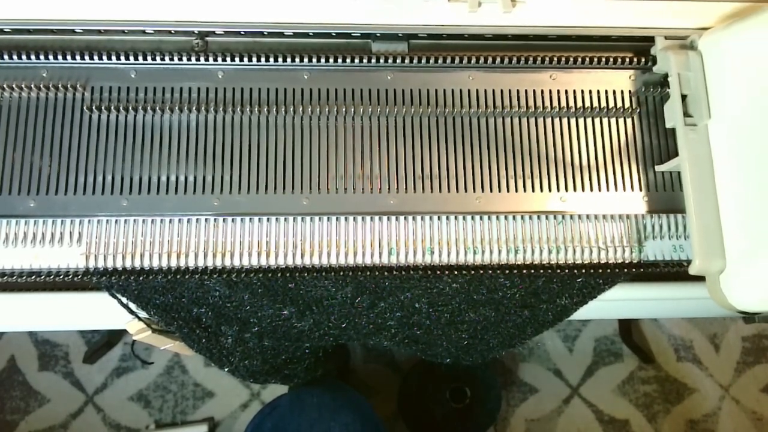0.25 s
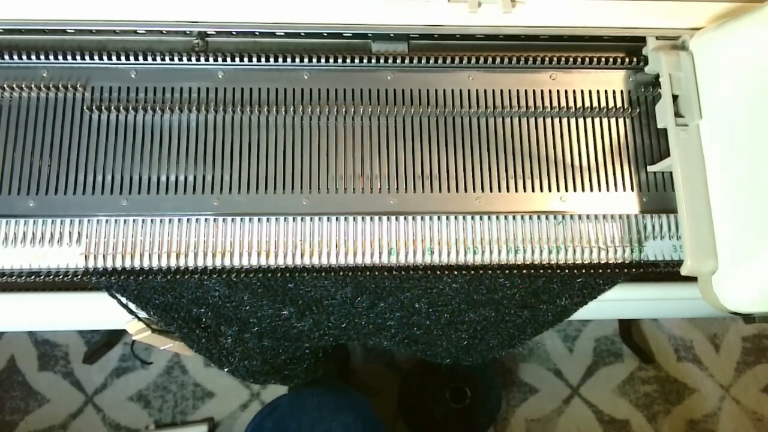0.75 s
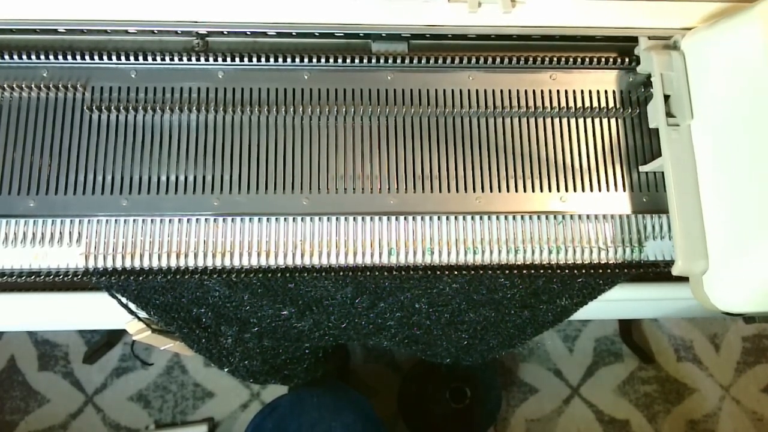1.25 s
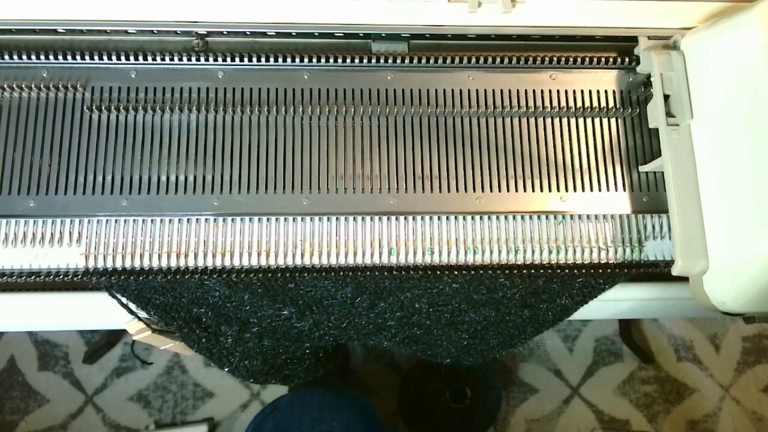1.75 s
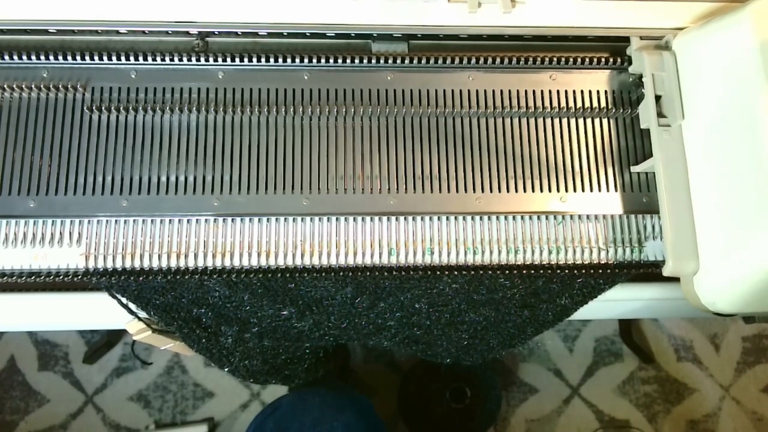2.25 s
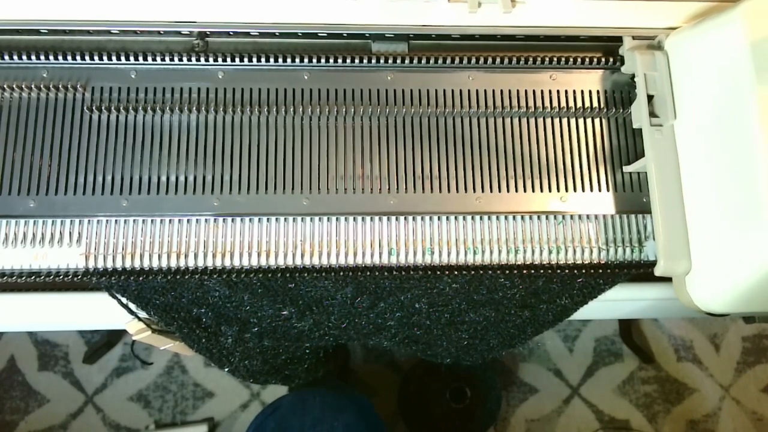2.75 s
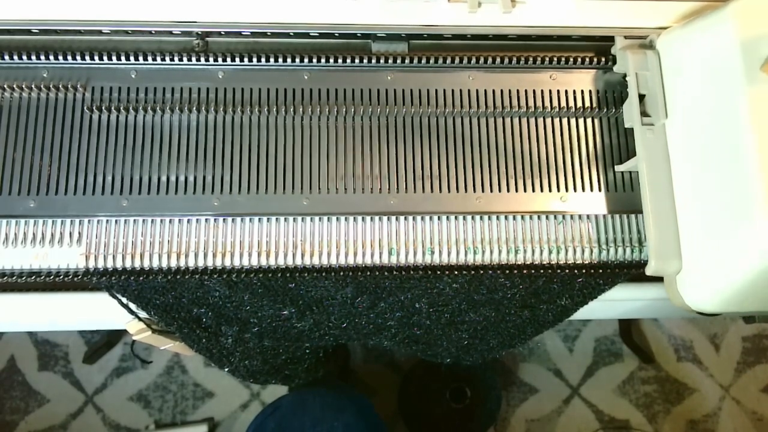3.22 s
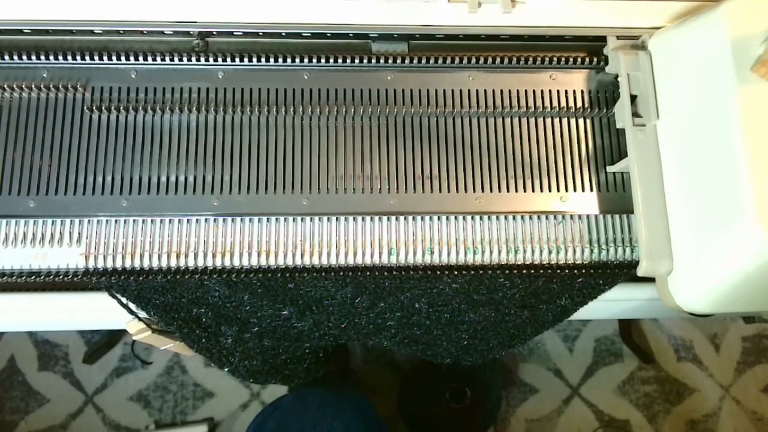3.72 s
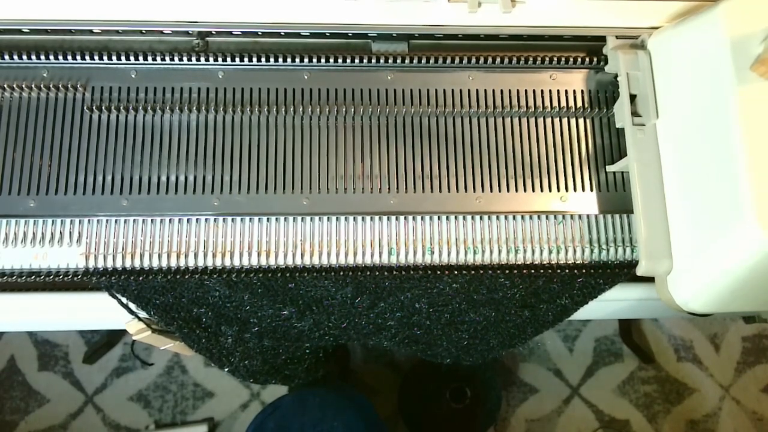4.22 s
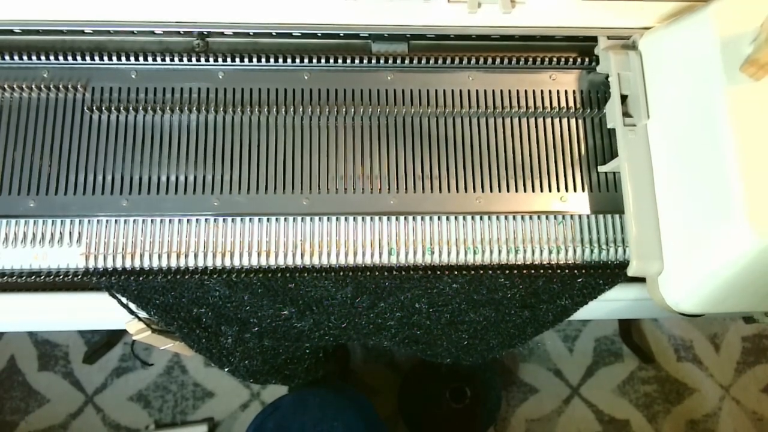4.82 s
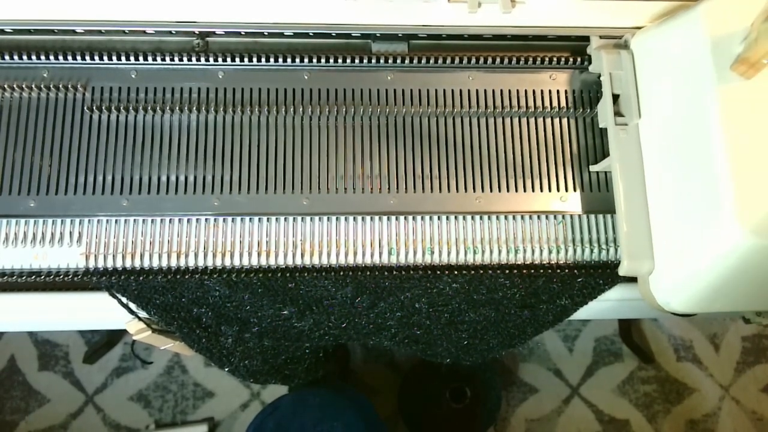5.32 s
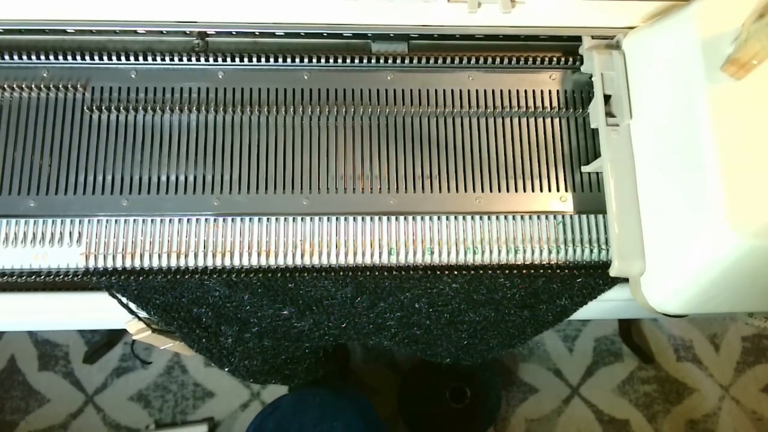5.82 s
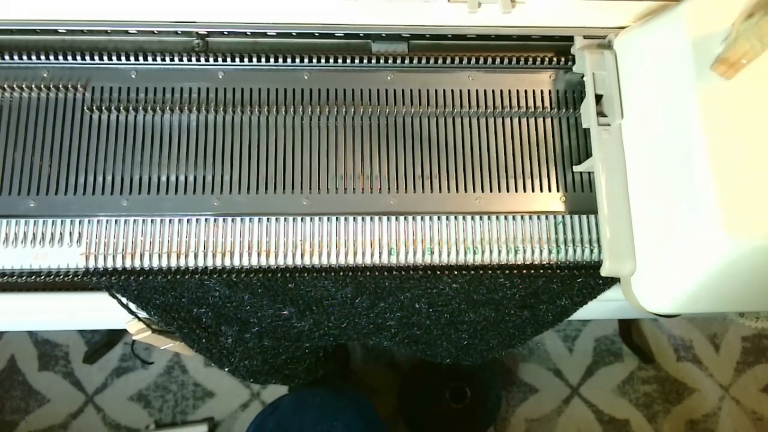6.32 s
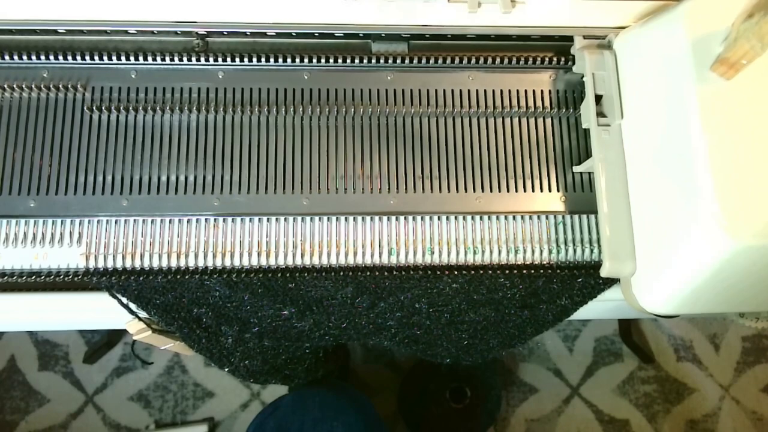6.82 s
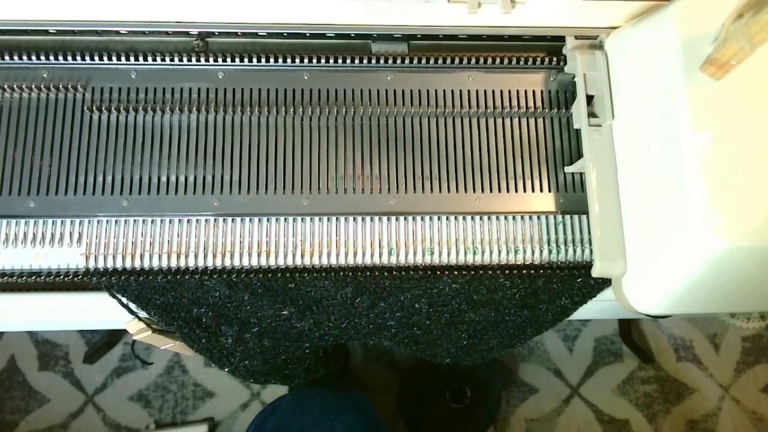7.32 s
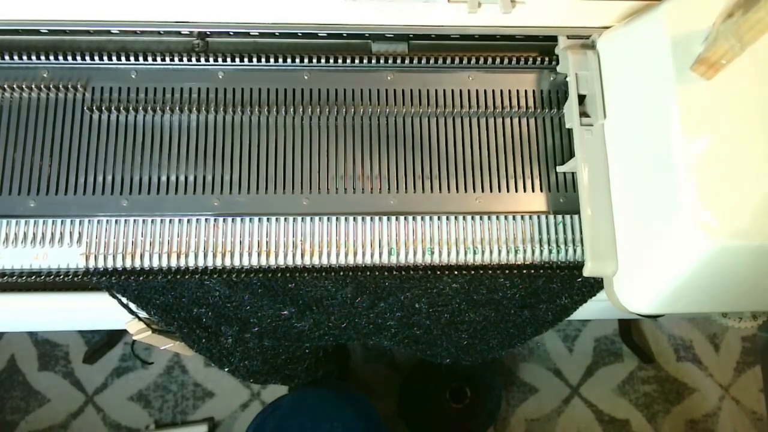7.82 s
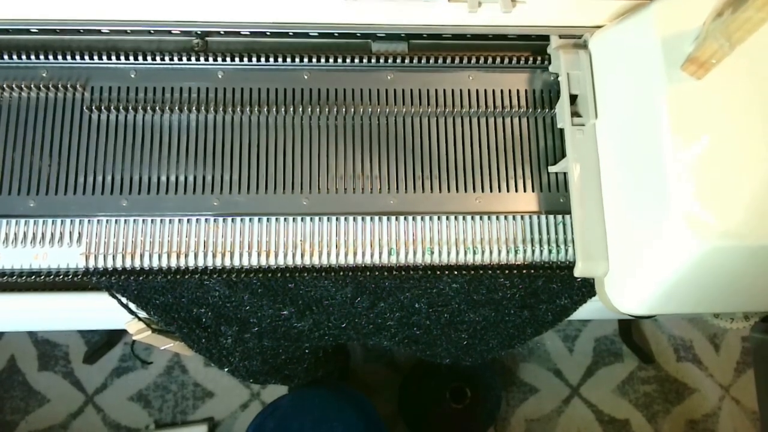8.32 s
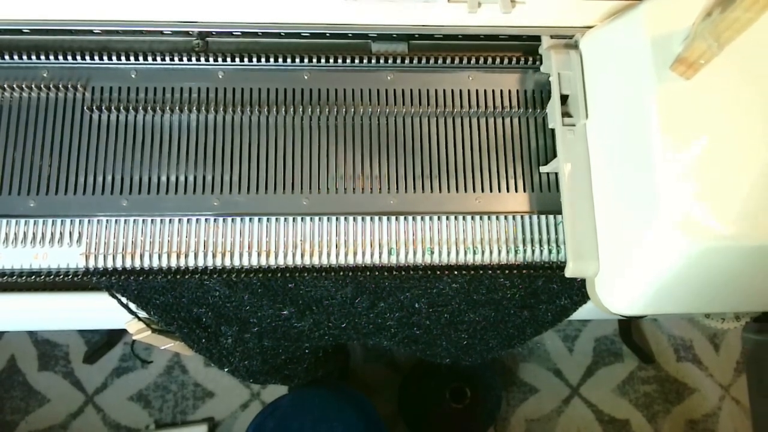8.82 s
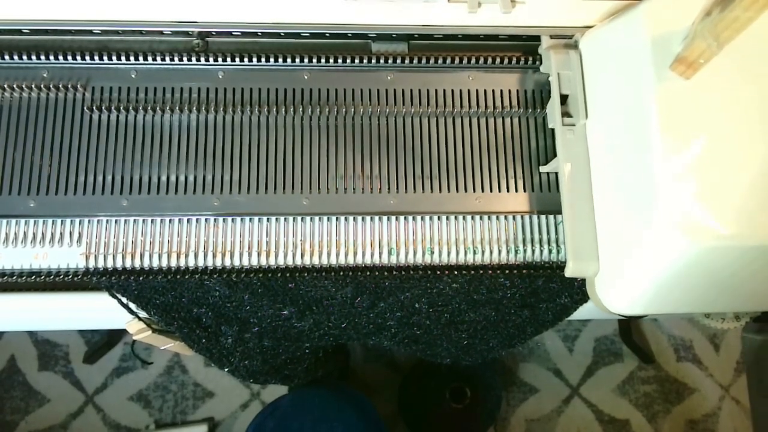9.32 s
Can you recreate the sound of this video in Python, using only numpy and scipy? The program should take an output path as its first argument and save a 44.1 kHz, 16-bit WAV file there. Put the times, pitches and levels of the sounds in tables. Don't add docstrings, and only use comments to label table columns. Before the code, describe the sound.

A motorised knitting machine carriage runs throughout in a small room. A gritty motor whir swells and eases with each stitch, while casing, cams, needles and latches clatter in the same uneven run of clicks about every 0.63 seconds. Small metallic pings and occasional stray snaps poke through. The close microphone sounds bright and slightly overloaded, with a ringing edge near 4.4 kHz.

```python
import sys
import numpy as np
from scipy import signal
from scipy.fft import rfft, irfft, next_fast_len
from scipy.io import wavfile
from scipy.ndimage import uniform_filter1d

SR = 44100
rng = np.random.default_rng(int(sys.argv[2]) if len(sys.argv) > 2 else 0)


def gain_from_db(level_db):
    decades = np.asarray(level_db, float) / 20
    return 10 ** decades


def persist_wave(psi):
    counts = np.round(np.clip(psi, -1, 1) * 32767).astype(np.int16)
    wavfile.write(sys.argv[1], SR, np.atleast_2d(counts).T)


N = 421575


def at_hz(points, hz):
    point_hz, point_db = np.array(points).T
    return np.interp(np.log(hz + 1), np.log(point_hz), point_db)


def colour(x, points, turn=1):
    size = next_fast_len(N + 4096)
    hz = np.arange(size // 2 + 1) * SR / size
    return irfft(turn * rfft(x, size) * gain_from_db(at_hz(points, hz)), size)[:N]


def ring(clicks, hz, t60):
    radius = gain_from_db(-60 / (t60 * SR))
    angle = 2 * np.pi * hz / SR
    return signal.lfilter([0, np.sin(angle)], [1, -2 * radius * np.cos(angle), radius ** 2], clicks + 1e-18)


def swell(blows, length_s):
    fade = np.exp(-1 / (length_s * SR))
    return signal.lfilter([2 * (1 - fade) ** 1.5], [1, -2 * fade, fade ** 2], blows + 1e-18)


def grains(grain_db):
    grit = rng.standard_normal(N) * gain_from_db(grain_db * np.minimum(rng.exponential(1, N), 5))
    return grit / grit.std()


def drift(rate):
    knots = rng.standard_normal(9000)
    return np.interp(np.arange(N) / SR * rate, np.arange(9000), knots)


def train(seconds, sizes):
    at = np.round(seconds * SR).astype(int)
    inside = (at >= 0) & (at < N)
    clicks = np.zeros(N)
    np.add.at(clicks, at[inside], sizes[inside])
    return clicks


def stitch_starts():
    first_s, stitch_s, slowing_s = .0012, .63023, .000028
    stitch = np.arange(-1, 16)
    return first_s + stitch_s * stitch + slowing_s * stitch ** 2


def once_a_stitch(into_s, scatter_db):
    seconds = stitch_starts() + into_s
    return train(seconds, gain_from_db(scatter_db * rng.standard_normal(len(seconds))))


def load_db():
    # into_stitch_s [s], level_db [dB]
    strain = [(0, 3.5), (.06, 7), (.13, 4.5), (.2, 3.5), (.33, 2), (.39, 6), (.5, 7.5), (.59, 6.5),
              (.6306, 5)]
    t, starts = np.arange(N) / SR, stitch_starts()
    into_s = t - starts[np.clip(np.searchsorted(starts, t) - 1, 0, None)]
    return np.interp(into_s, *np.transpose(strain))


def motor(flicker_db, rumble_depth, hiss_depth):
    # pitch_hz [Hz], level_db [dB per Hz]
    whir_colour = [(18, -34), (30, -13), (64, -21.5), (384, -32), (584, -25.5), (666, -11), (822, -7.5),
                   (1350, -11.5), (2290, -9), (3220, -8.5), (4420, 2.5), (5310, -10.5), (7670, -25),
                   (16000, -39.5)]
    # pitch_hz [Hz], rms_db [dB], t60_s [s]
    housing = [(619, -53.5, 0.05), (847, -53.5, 0.025)]
    grit = grains(grain_db=3.0) * gain_from_db(flicker_db * drift(150))
    whir = colour(grit, whir_colour)
    whir *= gain_from_db(-34.0) / whir.std()
    for hz, rms_db, t60 in housing:
        hum = ring(grit, hz, t60)
        whir += gain_from_db(rms_db) * hum / hum.std()
    rumble = signal.sosfiltfilt(signal.butter(2, 500, fs=SR, output="sos"), whir)
    hiss = signal.sosfiltfilt(signal.butter(2, 8000, "high", fs=SR, output="sos"), whir)
    body = whir - rumble - hiss
    load = load_db()
    return body * gain_from_db(load) + rumble * gain_from_db(rumble_depth * load - 1.0) + hiss * gain_from_db(hiss_depth * load - 2.5)


def contact_list(blows, part, slack, force):
    # into_stitch_s [s], level_db [dB]
    gear_ticks = [(.009, -15.5), (.051, -18), (.072, -16.5), (.105, -19.5), (.161, -17.5), (.212, -23.5),
                  (.232, -17.5), (.257, -20.5), (.285, -17.5), (.325, -23.5), (.347, -19.5), (.508, -20.5),
                  (.543, -18), (.559, -15.5), (.581, -18)]
    gear_colour_db = [-23.5, -10, -0.5, -15, -24.5]
    # start_s [s], level_db [dB]
    strays = [(0.227, -24), (0.8545, -24), (1.3125, -17), (1.9435, -24), (2.1136, -21), (2.5735, -20.5),
              (3.377, -18), (3.5214, -23), (5.236, -30), (5.5674, -30), (6.19, -22), (6.4936, -29),
              (6.8502, -23), (7.8294, -33), (7.9139, -31), (8.1104, -23), (9.0523, -22), (9.3734, -21)]
    stray_colour_db = [-21, -9, 6, 2, -9]
    leads_s = [0.00495, 0.00221, .0026, .0014, .001]
    play_s, force_spread_db = .0003, 2

    ticks = np.add(gear_ticks, [0, gear_colour_db[part]])
    into_s, level_db = np.transpose(np.vstack([blows, ticks]))
    starts = stitch_starts()
    seconds = (starts[:, None] + into_s).ravel() - leads_s[part]
    at = np.clip((seconds * SR).astype(int), 0, N - 1)
    stray_s, snap_db = np.transpose(strays)
    all_s = np.append(seconds + play_s * slack[at], stray_s)
    all_db = np.append(np.tile(level_db, len(starts)), snap_db + stray_colour_db[part])
    change_db = np.append(force_spread_db * force[at], 0 * stray_s)
    return all_s, all_db, change_db


def mechanism():
    # pitch_hz [Hz], level_db [dB], t60_s [s]
    casing = [(291, -10.5, 0.093), (446, -21, 0.053), (585, -7, 0.039), (730.4, 0, 0.036),
              (829, 1.5, 0.038), (990.5, -4, 0.014), (1126, 0, 0.025)]
    # pitch_hz [Hz], level_db [dB], t60_s [s]
    cam = [(1503, -9, 0.048), (1760, -6, 0.046), (2053, -3.5, 0.021), (2340, 4, 0.0069), (2837, 9, 0.0046),
           (3224, 6, 0.0064)]
    # pitch_hz [Hz], level_db [dB], t60_s [s]
    port = [(3794, 1.5, 0.0058), (4103, 3, 0.0076), (4402, 0.5, 0.014), (4695, -1.5, 0.0088),
            (5410, -3, 0.0034)]
    # pitch_hz [Hz], level_db [dB], t60_s [s]
    needle = [(6170, 4.5, 0.0031), (7250, -0.5, 0.0032), (7600, 3, 0.0015), (9100, 4, 0.0011)]
    # pitch_hz [Hz], level_db [dB], t60_s [s]
    latch = [(10240, -2.5, 0.004), (11580, -6.5, 0.0023), (12700, 0.5, 0.0013), (15300, -1, 0.00214)]
    # into_stitch_s [s], level_db [dB]
    casing_blows = [(0.0318, -40.0), (0.0641, -32), (0.0897, -37.5), (0.1054, -47), (0.1182, -35.5),
                    (0.1441, -47), (0.1957, -57), (0.2194, -40), (0.3007, -41), (0.3582, -43.5),
                    (0.3706, -43), (0.3891, -34.0), (0.426, -32.5), (0.4355, -42), (0.4571, -40),
                    (0.4827, -52), (0.5011, -40), (0.5207, -40), (0.57, -31.5), (0.5898, -34.5)]
    # into_stitch_s [s], level_db [dB]
    cam_blows = [(0.0207, -21.5), (0.0296, -24.5), (0.0623, -17), (0.0685, -27), (0.0839, -28.5),
                 (0.1184, -32), (0.1392, -24), (0.191, -25.5), (0.2241, -27.0), (0.295, -22),
                 (0.3591, -26.0), (0.3904, -22.5), (0.4004, -21), (0.4241, -21), (0.4347, -28),
                 (0.445, -18), (0.4555, -27), (0.4786, -24.5), (0.491, -25), (0.5, -19.5), (0.5277, -29),
                 (0.5743, -17), (0.5812, -22), (0.5906, -23.5)]
    # into_stitch_s [s], level_db [dB]
    port_blows = [(0.021, -11.5), (0.033, -16), (0.0529, -10), (0.0616, -6.5), (0.0847, -8.5),
                  (0.1176, -18), (0.1444, -15), (0.19, -22), (0.2017, -13.5), (0.2247, -17.5),
                  (0.2678, -19), (0.2788, -18), (0.2953, -12), (0.362, -13.5), (0.382, -12), (0.391, -12),
                  (0.401, -10.5), (0.416, -14.5), (0.4273, -8.5), (0.4369, -11.5), (0.4472, -5.5),
                  (0.465, -34), (0.4785, -9), (0.492, -8.5), (0.5265, -14), (0.563, -17.5), (0.5721, -7.5),
                  (0.5907, -10), (0.6007, -35), (0.6216, -18)]
    # into_stitch_s [s], level_db [dB]
    needle_blows = [(0.0175, -25.5), (0.0316, -43.5), (0.052, -31), (0.0612, -21.5), (0.082, -17),
                    (0.1402, -21.5), (0.1893, -35), (0.2243, -29), (0.2676, -29.5), (0.2937, -24),
                    (0.3583, -32), (0.3801, -26.5), (0.3881, -33), (0.4005, -43), (0.4148, -25.0),
                    (0.4269, -21.5), (0.4383, -15.5), (0.4451, -18.5), (0.4781, -22.5), (0.4916, -21.5),
                    (0.5295, -25), (0.562, -22), (0.5713, -12), (0.581, -25), (0.5904, -36), (0.6227, -25)]
    # into_stitch_s [s], level_db [dB]
    latch_blows = [(0.0122, -29), (0.0605, -34), (0.0828, -23), (0.1139, -35.5), (0.1388, -32),
                   (0.1645, -35.5), (0.2006, -30.5), (0.2233, -57), (0.2682, -31), (0.2939, -29.5),
                   (0.3623, -31), (0.3833, -28.0), (0.3921, -33), (0.4237, -25), (0.4384, -19),
                   (0.4451, -22.5), (0.4557, -24), (0.4776, -39), (0.4905, -27.0), (0.5303, -22),
                   (0.5647, -18), (0.5727, -15.5), (0.5799, -28), (0.622, -33)]
    # level_db [dB], rattle_s [s], share of the force change [0-1], mode scatter_db [dB], chatter_db [dB]
    parts = [
        (0.5, 0.004, 0.17, 1.5, -6),
        (-11, 0.0036, 1, 3, -3),
        (-6, 0.0016, 0.97, 0.8, -2.5),
        (-10, 0.0018, 0.55, 3.5, -3),
        (-8.5, 0.001, .6, 2.5, 1.5),
    ]
    strikes = [.5, .5, .8, .5, .3]
    chatter_leads_s = [0.0057, 0.0049, 0.0012, 0.0053, 0.0046]
    chatter_s = 0.0041

    all_modes = [casing, cam, port, needle, latch]
    all_blows = [casing_blows, cam_blows, port_blows, needle_blows, latch_blows]
    slack, force = drift(60), drift(110)
    fine, coarse = grains(grain_db=1.2), grains(grain_db=3.0)
    out = np.zeros(N)
    for k, (modes, blows) in enumerate(zip(all_modes, all_blows)):
        seconds, levels, change_db = contact_list(blows, k, slack, force)
        part_db, rattle_s, share, scatter_db, chatter_db = parts[k]
        blow_db = levels + share * change_db + part_db
        part = np.zeros(N)
        for m, (hz, mode_db, t60) in enumerate(modes):
            sign = (-1) ** m
            size = gain_from_db(blow_db + mode_db + scatter_db * rng.standard_normal(len(seconds)))
            rattle = swell(train(seconds, size), rattle_s) * np.roll(fine, round(hz))
            rattle += strikes[k] * sign * train(seconds + .0004, size)
            loose = train(seconds - chatter_leads_s[k], size * gain_from_db(chatter_db))
            chatter = swell(loose, chatter_s) * coarse
            part += ring(rattle + sign * chatter, hz, t60)
        out += signal.sosfilt(signal.butter(2, 0.48 * modes[0][0], "high", fs=SR, output="sos"), part)
    return out


def table():
    jolts_s = [.531, .415, .523, .521, .02]
    # pitch_hz [Hz], level_db [dB], t60_s [s], direction [signed ratio]
    sways = [
        (15.8, -36.5, 1.3, 1),
        (16.1, -44, 0.43, 0.87),
        (77, -37, 0.27, -1),
        (31, -31, .1, -1),
        (62, -45, 0.4, 1),
    ]
    sway = np.zeros(N)
    for into_s, (hz, level_db, t60, way) in zip(jolts_s, sways):
        sway += way * gain_from_db(level_db) * ring(once_a_stitch(into_s, scatter_db=2.0), hz, t60)
    return signal.sosfilt(signal.butter(2, 160, fs=SR, output="sos"), sway)


def pin():
    pings_s = [.5305, .5305, .052, .083, .427, .4785, .558, .294, .491]
    pings_t60_s = [.006, .04, .012, .012, .03, .015, .008, .015, .015]
    # pitch_hz [Hz], level_db [dB]
    notes_hz_db = [(10270, -19.5), (10470, -35), (5920, -23.5), (5680, -18.5), (1980, -21), (3090, -17),
                   (7140, -29), (2450, -21.5), (2510, -23)]
    pings = np.zeros(N)
    for into_s, t60, (hz, level_db) in zip(pings_s, pings_t60_s, notes_hz_db):
        pings += gain_from_db(level_db) * ring(once_a_stitch(into_s, scatter_db=2.5), hz, t60)
    return signal.sosfilt(signal.butter(2, 1200, "high", fs=SR, output="sos"), pings)


def tail(t60, cut_hz):
    t = np.arange(round(.4 * SR)) / SR
    echo = rng.standard_normal(len(t)) * gain_from_db(-60 * t / t60)
    echo = signal.sosfilt(signal.butter(1, cut_hz, fs=SR, output="sos"), echo)
    return echo / np.sqrt(np.sum(echo ** 2))


def room(machine):
    echoes = np.append(np.zeros(130), tail(t60=0.15, cut_hz=22000))
    return gain_from_db(-13) * signal.fftconvolve(machine, echoes)[:N]


def port_difference(mid):
    # pitch_hz [Hz], level_db [dB]
    side_colour = [(60, -19), (110, -28), (200, -30), (380, -31.5), (700, -33), (1290, -26), (2380, -20.5),
                   (4400, -14), (8120, -11), (15000, -10)]
    side = colour(mid, side_colour, turn=1j) * gain_from_db(-2.0)
    treble = signal.butter(4, 7000, "high", fs=SR, output="sos")
    own_rattle = gain_from_db(-6) * signal.sosfilt(treble, mid) * drift(700)
    own_hiss = gain_from_db(-65) * rng.standard_normal(N)
    return side + signal.sosfilt(treble, own_rattle + own_hiss)


def scene():
    approach_db_per_s = 0.1546
    nearer = gain_from_db(approach_db_per_s * (np.arange(N) - N / 2) / SR)
    machine = (mechanism() + pin()) * nearer
    mid = machine + room(machine) + motor(flicker_db=2.5, rumble_depth=1.78, hiss_depth=1.57)
    side = port_difference(mid)
    mid = mid + table()
    return np.array([mid + side, mid - side])


def roll_off(x):
    return signal.sosfilt(signal.butter(12, 16530, fs=SR, output="sos"), x)


def record(dry):
    overload, offset_level, offset_per_db = .62, .0054, .001
    load = load_db()
    offset = offset_level + offset_per_db * uniform_filter1d(load - load.mean(), size=2000)
    rounded = overload * np.tanh(dry / overload)
    cut = signal.sosfilt(signal.ellip(12, .5, 80, 15830, fs=SR, output="sos"), rounded)
    return roll_off(cut + offset)


dry = scene()
out = record(dry)
persist_wave(out)
```